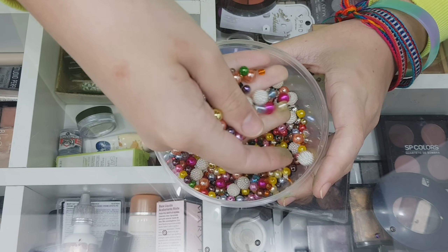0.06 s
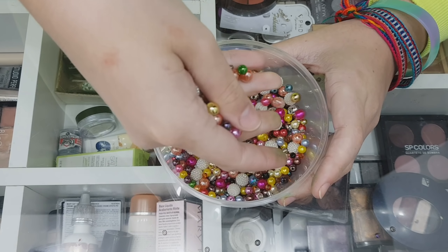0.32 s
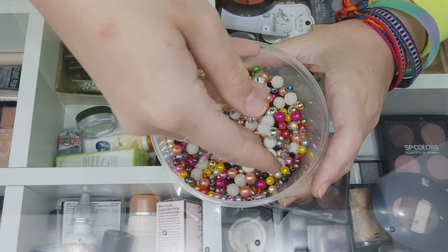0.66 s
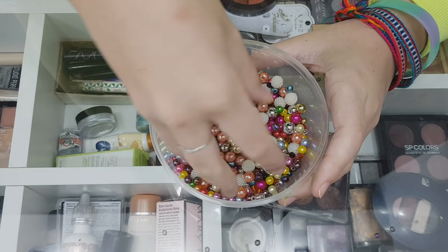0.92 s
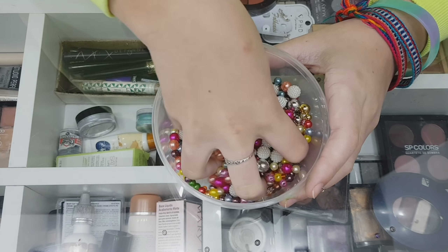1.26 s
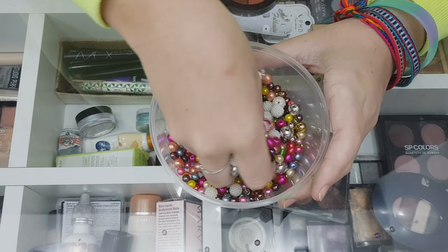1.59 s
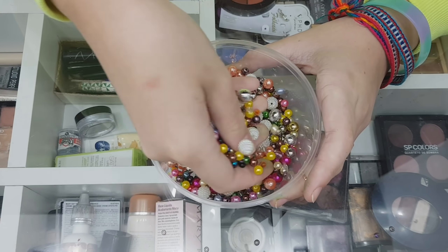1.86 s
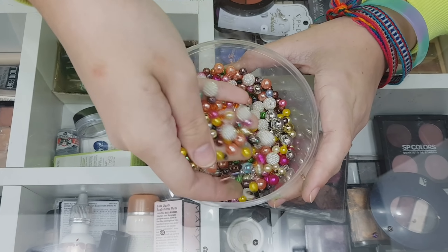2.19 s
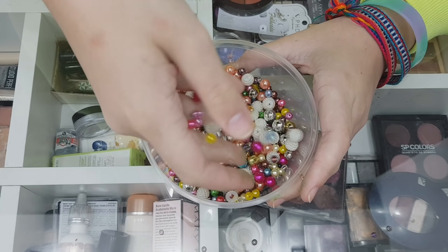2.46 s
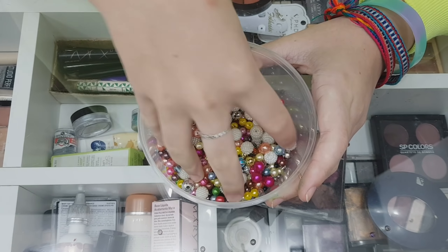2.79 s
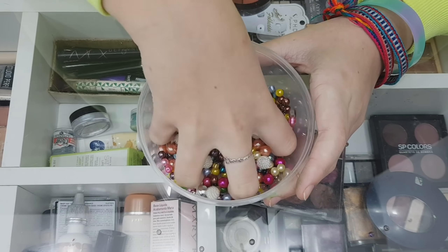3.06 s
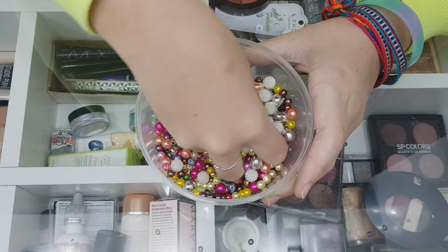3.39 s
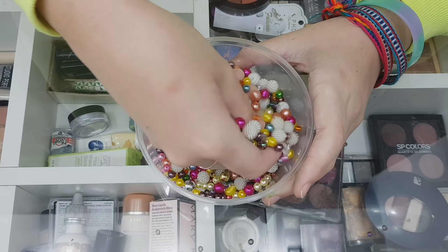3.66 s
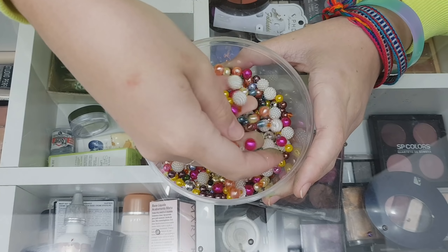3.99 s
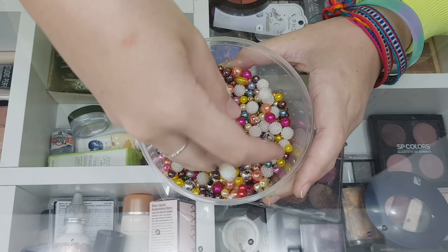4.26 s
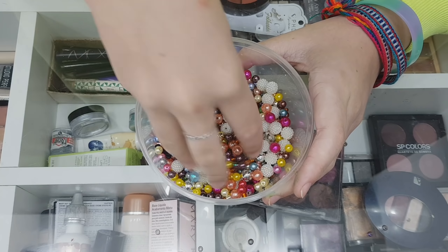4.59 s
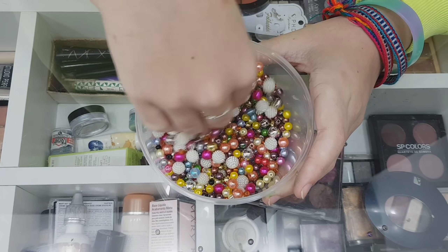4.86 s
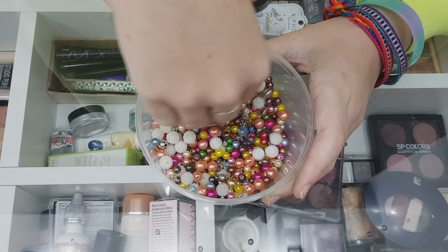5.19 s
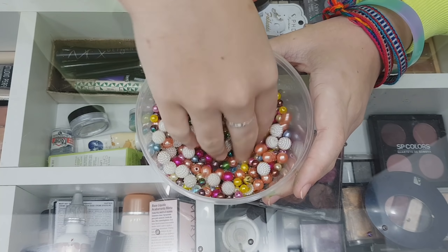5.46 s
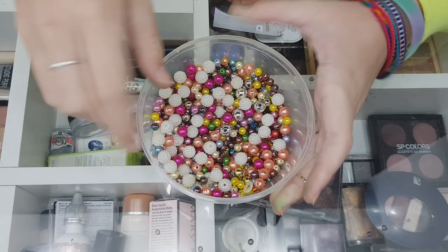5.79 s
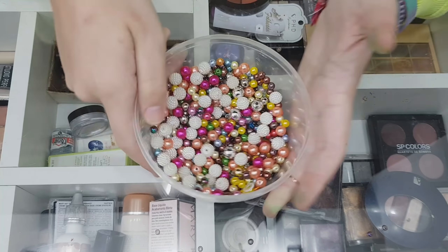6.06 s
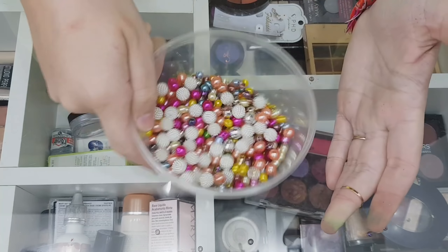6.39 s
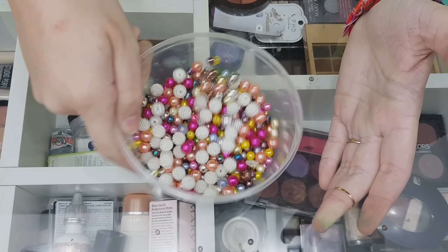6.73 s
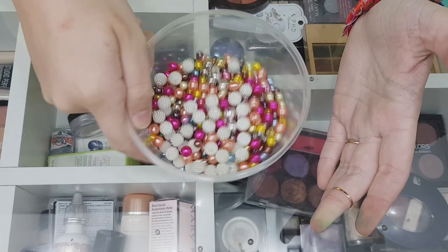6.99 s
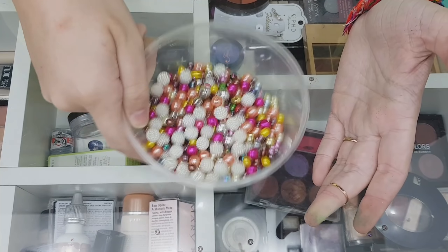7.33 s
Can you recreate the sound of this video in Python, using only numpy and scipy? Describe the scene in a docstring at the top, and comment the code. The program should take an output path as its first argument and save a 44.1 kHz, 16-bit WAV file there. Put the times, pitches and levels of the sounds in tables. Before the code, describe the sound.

A hand scoops small plastic beads and lets them trickle back into a thin plastic bowl, with bright ticks and single hollow knocks. Three times the fingers dig deep, making a denser rattle with low rumbling and soft thuds. Near the end the bowl wall pops and the beads are shaken in a quick rhythm. Heard close up in a small, quiet furnished room.

```python
"""Beads in a plastic bowl

A hand stirs small plastic beads in a thin plastic bowl, lets them trickle back and finally shakes it.
Beads tick against each other and knock on the wall, which rings; digging fingers make the bottom rumble,
and the wall snaps as the grip changes. Heard close up in a small furnished room."""
import sys
import numpy as np
from scipy import signal
from scipy.fft import rfft, irfft, next_fast_len
from scipy.io import wavfile
from scipy.ndimage import uniform_filter1d

SR = 44100
rng = np.random.default_rng(int(sys.argv[2]) if len(sys.argv) > 2 else 0)


def unload_audio(sound):
    """Save the sound as a 16-bit wav file, at the path given as the first command line argument."""
    columns = np.transpose(np.atleast_2d(sound))
    # keep every value between -1 and 1, then stretch to whole-number steps
    steps = np.round(np.clip(columns, -1, 1) * 32767)
    wavfile.write(sys.argv[1], SR, steps.astype(np.int16))


N = 328545
TIME = np.arange(N) / SR
RING_TIME = TIME[:SR // 10]
LET_GO_S, SHAKE_START_S = 5.6, 6.23   # the cupping hand leaves the wall; the shake begins

# single beads that stand out as they land: (time [s], bottom knock [dB], wall knock [dB], tick [dB])
DROPS = [(0.157, -25, -18, -26), (0.253, -16, -13.5, -16), (0.319, -21, -18.5, -34),
         (0.364, -26, -19.5, -35), (0.502, -31, -19.5, -36), (0.511, -20.5, -21.5, -31),
         (0.565, -18.5, -17.5, -31), (0.627, -18.5, -17, -26), (0.655, -20, -13.5, -21),
         (0.711, -17.5, -20.5, -17), (0.747, -28, -14, -20), (0.753, -19, -20, -27),
         (0.783, -16.5, -18, -41), (0.829, -22, -26, -20.5), (0.844, -29, -19.5, -32),
         (1.011, -48, -36, -33), (2.011, -25, -14.5, -39), (2.062, -34, -13.5, -23), (2.298, -28, -20, -32),
         (2.489, -18.5, -23.5, -22.5), (2.533, -19.5, -17, -38), (2.627, -20, -20, -32),
         (2.639, -31, -17, -36), (2.701, -29, -25.5, -30), (2.734, -21, -21.5, -29), (2.757, -31, -28, -22),
         (3.891, -18, -21, -31), (4.202, -33, -19, -21), (4.222, -15, -16.5, -35),
         (4.299, -17.5, -16.5, -20), (4.372, -19.5, -14.5, -22), (4.527, -18, -21, -19.5),
         (5.424, -17, -20, -34), (5.682, -25, -22, -29.5), (5.716, -35, -27, -37), (5.77, -41, -29, -29.5),
         (5.993, -50, -32.5, -33.5)]


def from_db(db):
    """Decibels to gain."""
    return 10 ** (np.asarray(db) / 20)


def unit(x):
    """Scale a response to energy 1 per channel."""
    return x / np.sqrt(np.sum(x ** 2, axis=-1, keepdims=True) + 1e-20)


def fade(t, t60):
    """Exponential decay by 60 dB in t60."""
    return np.exp(-np.log(1000) * t / t60)


def ping(hz, t60):
    """One struck mode: a decaying sine."""
    return np.sin(2 * np.pi * hz * RING_TIME) * fade(RING_TIME, t60)


def filtered(x, kind, hz, order=2):
    """Butterworth low-, high- or band-pass."""
    return signal.sosfilt(signal.butter(order, hz, kind, fs=SR, output="sos"), x)


def colour(x, points):
    """Minimum-phase EQ through points of (frequency [Hz], gain [dB])."""
    size = 2 * next_fast_len(x.shape[-1] // 2 + 2048)
    hz, db = np.transpose(points)
    bins = np.maximum(np.arange(size // 2 + 1) * SR / size, 1)
    gain = from_db(np.interp(np.log(bins), np.log(hz), db))
    cepstrum = irfft(np.log(gain))
    cepstrum[1:size // 2] *= 2
    cepstrum[size // 2 + 1:] = 0
    return irfft(rfft(x, size) * np.exp(rfft(cepstrum)))[..., :x.shape[-1]]


def add(out, s, sound):
    """Mix a short sound into both channels at s seconds."""
    start = max(round(s * SR), 0)
    out[:, start:start + sound.shape[-1]] += sound[..., :N - start]


def stroke(start, rise_s, end, fall_db_per_s):
    """Envelope of one movement: attack, hold, release."""
    attack = np.clip((TIME - start) / rise_s, 0, 1)
    return attack * from_db(-fall_db_per_s * np.clip(TIME - end, 0, 1))


def contacts(per_s, spread_db, share_s):
    """Random contacts of uneven size that share out a steady power of 1."""
    hits = rng.random(N) < per_s / SR
    sizes = from_db(spread_db * np.clip(rng.standard_normal(N), -2, 2))
    clicks = hits * sizes * rng.choice([-1, 1], N)
    width = int(share_s * SR)
    power = uniform_filter1d(uniform_filter1d(clicks ** 2, width), width)
    return clicks / np.sqrt(np.maximum(power, 1 / SR))


def scatter(clicks, echo_db, t60, alike):
    """Each contact reaches left and right directly, then as a dying jumble of rebounds and reflections."""
    right_arrival = np.clip(np.arange(N) + rng.integers(-2, 2, N), 0, N - 1)
    direct = np.array([clicks, np.bincount(right_arrival, clicks, N)])
    decay = fade(1 / SR, t60) ** 2
    power = signal.lfilter([0, 1 - decay], [1, -decay], clicks ** 2 + 1e-18)
    jumble = np.sqrt(alike) * rng.standard_normal(N) + np.sqrt(1 - alike) * rng.standard_normal((2, N))
    echo = from_db(echo_db)
    return (direct + echo * np.sqrt(power) * jumble) / np.hypot(1, echo)


def trickling(rise_s=0.031, fall_db_per_s=197):
    """Power of beads running off the hand or across the bowl; each stream swells or thins evenly."""
    # streams of beads: (start [s], end [s], first level [dB], last level [dB])
    streams = [(-0.04, 0.203, -27.5, -25), (0.22, 0.477, -35.5, -36.5), (0.56, 0.725, -28, -28),
               (.8, .99, -35, -50.5), (1.282, 1.612, -32.5, -26.5), (1.633, 2.015, -24.5, -28),
               (1.997, 2.425, -31, -27.5), (2.45, 2.592, -34.5, -32.5), (2.757, 2.814, -42, -37),
               (3.283, 3.895, -28.5, -23), (3.913, 4.188, -29.5, -30.5), (4.226, 4.426, -34.5, -29.5),
               (4.446, 4.57, -34, -42.5), (5.488, 5.74, -24.5, -41.5), (5.98, 6.233, -44.5, -37.5)]
    power = np.zeros(N)
    for start, end, first_db, last_db in streams:
        level = from_db(np.interp(TIME, [start, end], [first_db, last_db]))
        power += (level * stroke(start, rise_s, end, fall_db_per_s)) ** 2
    return power


def strays(per_s=30, bottom_db=27, wall_db=27, tick_db=20, spread_db=4.5):
    """Lighter beads fall at random out of every trickle."""
    hits = rng.random(N) < per_s / SR
    falls = hits * from_db(spread_db * rng.uniform(-1, 1, N)) * np.sqrt(trickling())
    return np.outer(from_db([bottom_db, wall_db, tick_db]), falls)


def heap(wall_db, beads_db, brisk_db=-27, crowding=1.15, looseness=.6):
    """Random bottom knocks, wall knocks and bead ticks: the livelier the heap, the denser they come."""
    # beads that fall freely on the wall make fewer, more separate contacts than pushed ones
    density = (from_db(crowding * (beads_db - brisk_db)) + .2) * from_db(looseness * (beads_db - wall_db))
    wall = contacts(480 * density, spread_db=2.5, share_s=0.023)
    # a knock on the wall also shakes the bottom
    bottom = 0.73 * contacts(230 * density, spread_db=3.0, share_s=0.046) + 0.57 * wall
    ticks = contacts(2000 * density, spread_db=2.0, share_s=0.027)
    return from_db(wall_db - 3.5) * bottom, from_db(wall_db - 2.5) * wall, from_db(beads_db + 2.5) * ticks


def ring(modes, damping, low_hz=560):
    """Response of a part of the bowl: its modes start together, and it radiates little bass."""
    hz, db, t60 = np.transpose(modes)[:, :, None]
    decays = np.sqrt(damping) * from_db(db) * fade(RING_TIME, t60 / damping)
    partials = decays * np.cos(2 * np.pi * hz * RING_TIME)
    return filtered(partials.sum(axis=0), "high", low_hz)[None]


def bowl(bottom, wall, ring_db=-25, spot_db=3.5, hand_damping=2.36, muted_db=-7, cupped_db=-4):
    """Knocks drive the modes by where they land; a buried hand damps the bowl and mutes its bottom."""
    # how deep the hand is buried in the beads: (time [s], depth [0-1])
    hand_depth = [(0, 0.37), (.95, 0.18), (1.05, 0.5), (1.75, 0.86), (2.05, 0), (2.8, 0.1), (2.9, 0.7),
                  (4.1, 0.2), (4.75, 0)]
    # modes of the three parts of the free bowl: (frequency [Hz], level [dB], t60 [s])
    bottom_modes = [(376, -17, 0.012), (728, -14.5, 0.023), (962, -15.5, 0.096), (1108, 0, 0.046),
                    (1200, -4, 0.022)]
    lower_wall_modes = [(1690, -17, 0.13), (2063, 2, 0.018), (2318, 0.5, 0.019)]
    upper_wall_modes = [(2676, -2.5, 0.029), (2910, 0, 0.028), (3200, -1, 0.016), (4130, -2.5, 0.0079)]
    depth = np.interp(TIME, *np.transpose(hand_depth))
    parts = [(bottom_modes, bottom, muted_db * depth),
             (lower_wall_modes, wall, 0),
             (upper_wall_modes, wall, cupped_db * (TIME < LET_GO_S))]
    out = np.zeros((2, N))
    for modes, knocks, hand_db in parts:
        strength = from_db(ring_db + hand_db + spot_db * rng.uniform(-1, 1, N))
        drive = scatter(knocks * strength, echo_db=-0.5, t60=0.043, alike=0.39)
        # crossfade from a free to a damped bowl as the hand sinks in
        for share, damping in ((1 - depth, 1), (depth, hand_damping)):
            out += signal.oaconvolve(drive * share, ring(modes, damping), axes=1)[:, :N]
    return filtered(out, "low", hz=9000)   # the plastic gives, which rounds each knock


def rattle(wall_db, beads_db, click_db=-13):
    """Knocks ring the bowl and carry a click of their own; ticks are bright and have no pitch."""
    # tone of bead hitting bead: (frequency [Hz], gain [dB])
    tick_eq = [(100, -26), (230, -25), (400, -14), (700, -21.5), (1100, -2), (1500, -2.5), (2500, 3),
               (4000, 6.5), (6000, 4), (8700, 5), (10500, 3.5), (13000, -0.5), (16000, -6.5)]
    bottom, wall, ticks = heap(wall_db, beads_db) + drops() + strays()
    clicks = scatter(ticks + from_db(click_db) * wall, echo_db=4.0, t60=0.037, alike=0.036)
    return bowl(bottom, wall) + colour(clicks, tick_eq)


def rubbing(wall_db, rub_db=-29, band_hz=(190, 520)):
    """As long as a hand cups the bowl, fingers stirring the beads rub on its bottom with a dull grinding."""
    level = from_db(wall_db + rub_db) * (TIME < LET_GO_S)
    slips = level * contacts(per_s=700, spread_db=5.5, share_s=0.051)
    grind = scatter(slips, echo_db=-1.5, t60=0.033, alike=0.63)
    dull = unit(filtered(1.0 * (RING_TIME == 0), "band", band_hz))
    return signal.oaconvolve(grind, dull[None], axes=1)[:, :N]


def rumble(drag_db=-21.5, hold_db=-61, push_db=-3, rise_s=0.014, fall_db_per_s=174):
    """Beads slip under the fingers and flex the bottom, most when pressed."""
    # tone of the flexing bottom: (frequency [Hz], gain [dB])
    flex_eq = [(20, -34), (33, -19), (45, -4), (65, -3), (90, -2.5), (115, 4), (160, -6), (205, -5.5),
               (260, -24), (400, -19.5), (1000, -47), (4000, -87)]
    # the hand presses on the bottom: (start [s], end [s], level [dB])
    presses = [(1.022, 1.352, -35.5), (2.826, 3.28, -35), (4.725, 5.534, -43.5), (6, 6.12, -38.5)]
    flex = unit(colour(1.0 * (RING_TIME == 0), flex_eq))
    slips = signal.oaconvolve(contacts(per_s=220, spread_db=0, share_s=0.038), flex)[:N]
    pressed = sum(from_db(db + push_db) * stroke(start, rise_s, end, fall_db_per_s)
                  for start, end, db in presses)
    dragged = (from_db(hold_db) + from_db(drag_db) * np.sqrt(trickling())) * (TIME < SHAKE_START_S)
    return np.hypot(pressed, dragged) * slips


def drops(bottom_db=25.5, wall_db=22.5, tick_db=22, rebound_db=-18):
    """A falling bead strikes bottom, wall and other beads, and rebounds once."""
    out = np.zeros((3, N))
    rebounds_s = 0.003 * rng.uniform(0.28, 1.5, len(DROPS))
    for (s, *levels), rebound_s in zip(DROPS, rebounds_s):
        force = from_db(np.add(levels, [bottom_db, wall_db, tick_db]))
        out[:, round(s * SR)] += force
        out[:, round((s + rebound_s) * SR)] += from_db(rebound_db) * force
    return out


def flurries(jolt_db=-12, delay_s=.003, fall_db_per_s=396):
    """Power of the neighbours that each dropping bead sets moving for a moment."""
    jolts = np.zeros(N)
    for s, _, wall_db, _ in DROPS:
        jolts[round((s + delay_s) * SR)] = from_db(wall_db + jolt_db) ** 2
    decay = from_db(-fall_db_per_s / SR) ** 2
    return signal.lfilter([1], [1, -decay], jolts + 1e-18)


def bumps(gain_db=23.5, hollow_db=5.5):
    """The hand bumps the bowl: a low thud with a short, hollow knock."""
    # bumps of the hand: (time [s], level [dB], hollow share [dB])
    hits = [(.25, -29.5, -8.5), (1.061, -21, -26), (1.255, -22, -22), (2.087, -33.5, -4.5),
            (2.837, -37, -8), (2.913, -25, -18), (3.187, -25, -22), (3.25, -37, -28), (4.775, -28, -26),
            (5.319, -34, -13), (6.012, -25.5, -23), (6.089, -40, -5), (6.248, -32, -6.5)]
    thud = unit(ping(hz=108, t60=0.13))
    hollow = unit(ping(hz=380, t60=0.019))
    out = np.zeros((2, N))
    for s, db, share_db in hits:
        add(out, s, from_db(db + gain_db) * (thud + from_db(share_db + hollow_db) * hollow))
    return out


def digging(fall_db_per_s=122.5):
    """Power of the beads pushed aside by the fingers; the heap settles after each plunge."""
    # fingers plunge through the heap: (start [s], rise [s], end [s], level [dB])
    plunges = [(1.022, 0.034, 1.127, -23), (1.195, .06, 1.268, -20), (1.38, 0.091, 1.487, -19),
               (2.838, 0.046, 2.896, -21), (2.98, 0.12, 3.177, -21.5), (3.23, 0.042, 3.266, -17.5),
               (4.651, 0.0175, 4.69, -26.5), (4.715, 0.029, 4.835, -20.5), (4.864, 0.041, 5.01, -23),
               (5.012, .05, 5.14, -20), (5.159, 0.016, 5.33, -27.5), (5.25, 0.1, 5.47, -24)]
    return sum((from_db(db) * stroke(start, rise, end, fall_db_per_s)) ** 2
               for start, rise, end, db in plunges)


def snaps():
    """The thin wall pops and rings briefly as the grip changes."""
    # pops of the wall: (time [s], level [dB], pitch [Hz], t60 [s])
    pops = [(6.114, -23, 2330, 0.039), (6.235, -14.5, 2040, 0.035), (6.235, -15.5, 2340, 0.048)]
    out = np.zeros((2, N))
    for s, db, hz, t60 in pops:
        add(out, s, from_db(db) * ping(hz, t60))
    return out


def shaking(level_db=-20, sag_db_per_s=4.5, rise_s=0.079, build_s=0.24,
            shake_hz=5.43, forward_hit_s=6.978, slosh_db=2.5, forward_db=1.2):
    """Power of the shaken heap: it hits the wall twice a cycle, harder forwards, and slowly weakens."""
    since = TIME - SHAKE_START_S
    phase = 2 * np.pi * shake_hz * (TIME - forward_hit_s)
    swing = np.clip(since / build_s, 0, 1) ** 2   # the heap takes a moment to get swinging
    swell_db = swing * (slosh_db * np.cos(2 * phase) + forward_db * np.cos(phase))
    attack = np.clip(since / rise_s, 0, 1)
    return (attack * from_db(level_db - sag_db_per_s * since + swell_db)) ** 2


def liveliness(rest_db=-63, dig_wall_db=1.5, fall_wall_db=6, shake_wall_db=2.5):
    """Levels in dB of beads on the wall and on each other; falling beads favour the wall most."""
    falling = trickling() + flurries() + from_db(rest_db) ** 2
    moves = (digging(), dig_wall_db), (falling, fall_wall_db), (shaking(), shake_wall_db)
    on_wall = sum(power * from_db(wall_db) ** 2 for power, wall_db in moves)
    on_beads = sum(power for power, _ in moves)
    return 10 * np.log10(on_wall), 10 * np.log10(on_beads)


def room(x, wet_db=-15, t60=0.26, top_hz=7000, build_s=0.006):
    """The furnished room adds a faint, dull tail, different left and right."""
    t = TIME[:SR // 2]
    tail = rng.standard_normal((2, len(t))) * fade(t, t60) * (1 - np.exp(-t / build_s))
    tail = unit(filtered(tail, "low", top_hz, order=1))
    return x + from_db(wet_db) * signal.fftconvolve(x, tail, axes=1)[:, :N]


def room_tone(level_db=-67):
    """Still air: a low, steady hush, mostly in the centre."""
    # tone of the air: (frequency [Hz], gain [dB])
    air_eq = [(20, -4), (100, 7), (300, -22), (1000, -28), (4000, -28), (16000, -38)]
    air = colour(rng.standard_normal(N) + .4 * rng.standard_normal((2, N)), air_eq)
    return from_db(level_db) * air / np.std(air)


def scene():
    """Beads and bowl in the room, with dry handling noise, over quiet air."""
    wall_db, beads_db = liveliness()
    air = room_tone()
    beads_and_bowl = room(rattle(wall_db, beads_db) + snaps() + rubbing(wall_db))
    handling = filtered(rumble() + bumps(), "high", hz=35)
    return beads_and_bowl + handling + air


def record(dry, cutoff_hz=15800):
    """The right microphone is fuller and lacks the top; peaks clip and the highest treble is cut."""
    # tone of the right microphone against the left: (frequency [Hz], gain [dB])
    right_eq = [(50, 1), (150, 3), (300, 4.5), (550, 1.5), (1100, 3.5), (2400, 6), (3200, 6), (4200, -1),
                (6500, -0.5), (9000, 2), (10500, -0.5), (12000, -11.5), (16000, -8.5)]
    heard = np.clip([dry[0], colour(dry[1], right_eq)], -1, 1)
    return signal.sosfilt(signal.ellip(10, .1, 80, cutoff_hz, fs=SR, output="sos"), heard)


dry = scene()
out = record(dry)
unload_audio(out)
```